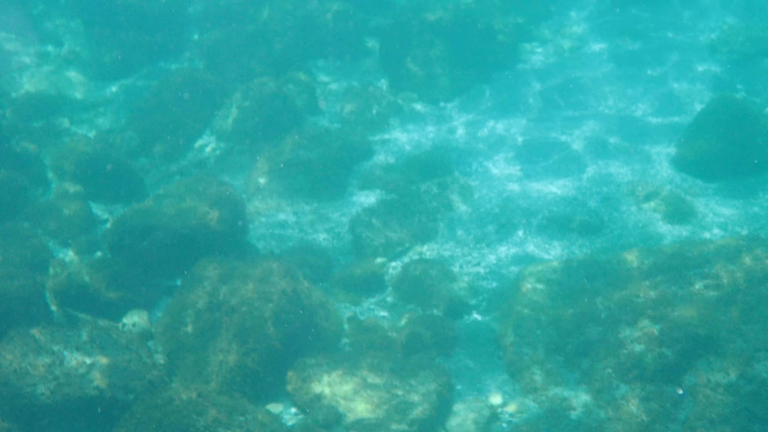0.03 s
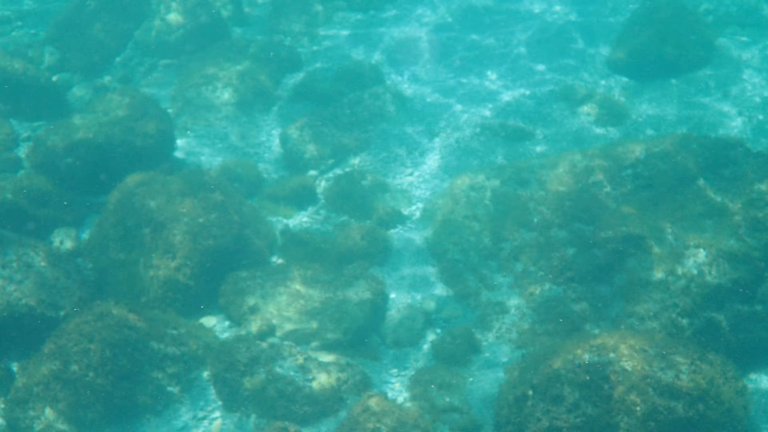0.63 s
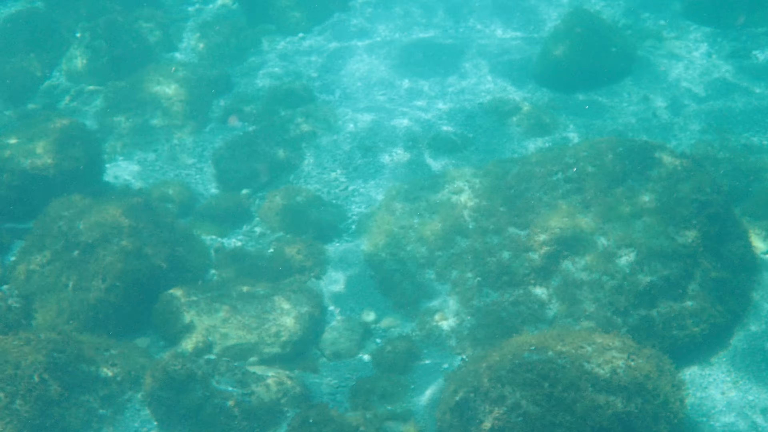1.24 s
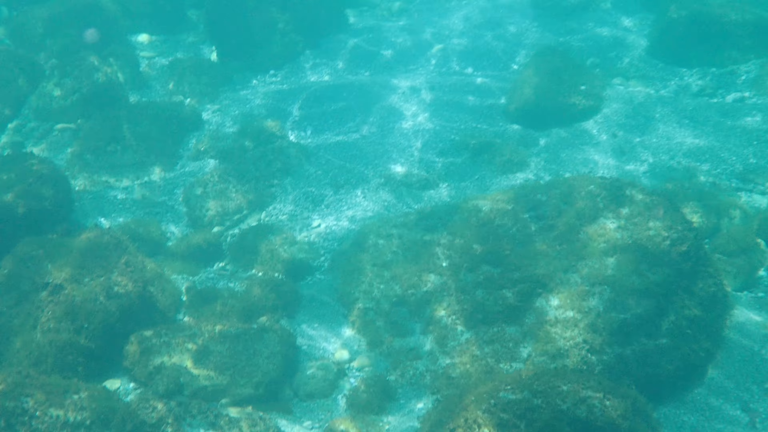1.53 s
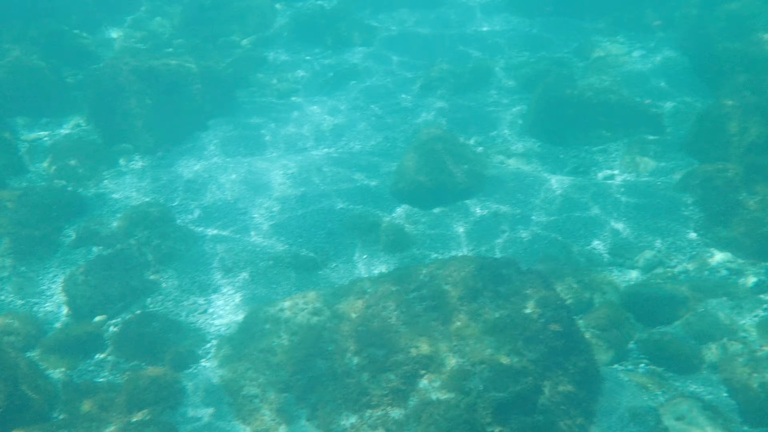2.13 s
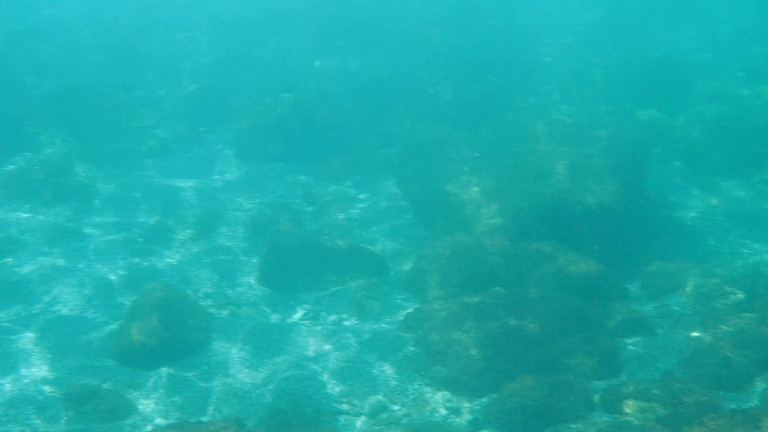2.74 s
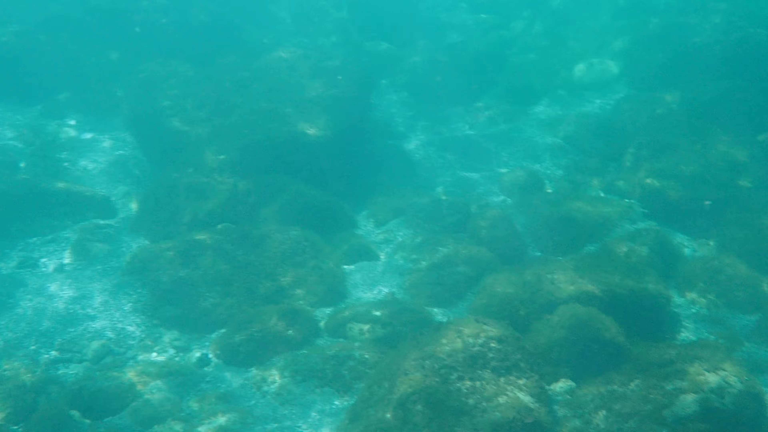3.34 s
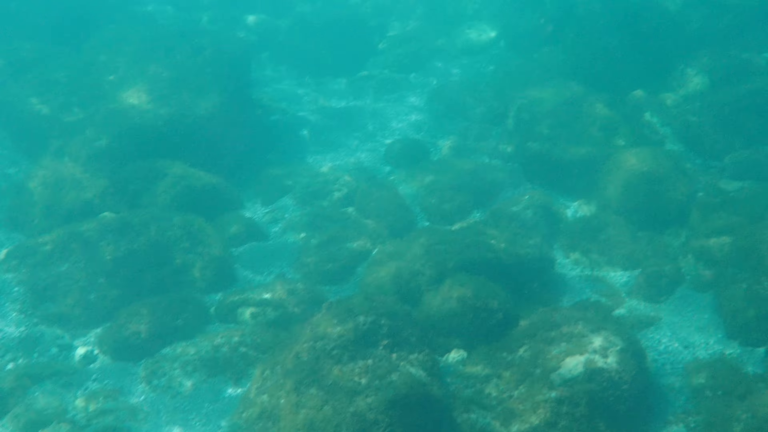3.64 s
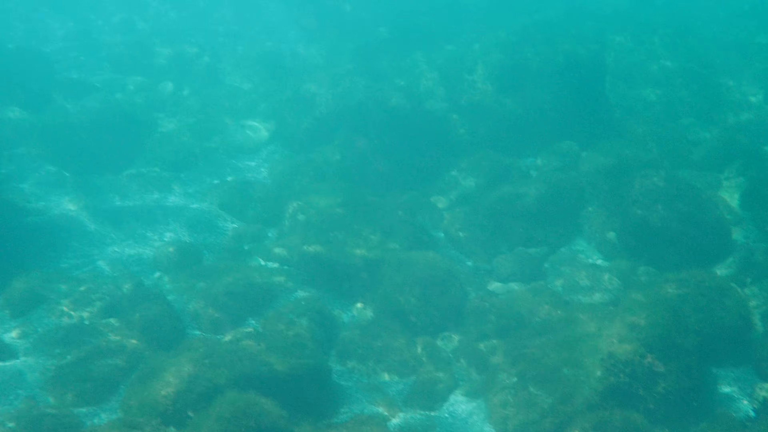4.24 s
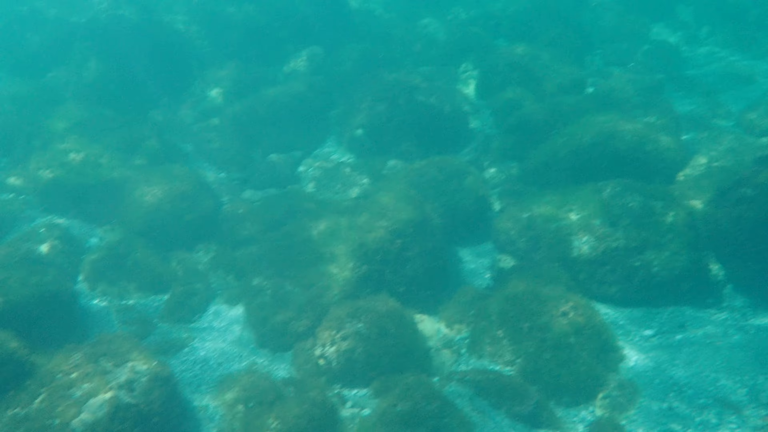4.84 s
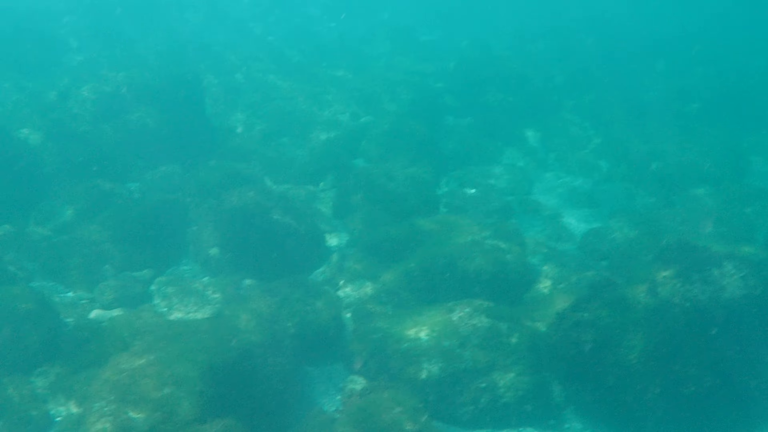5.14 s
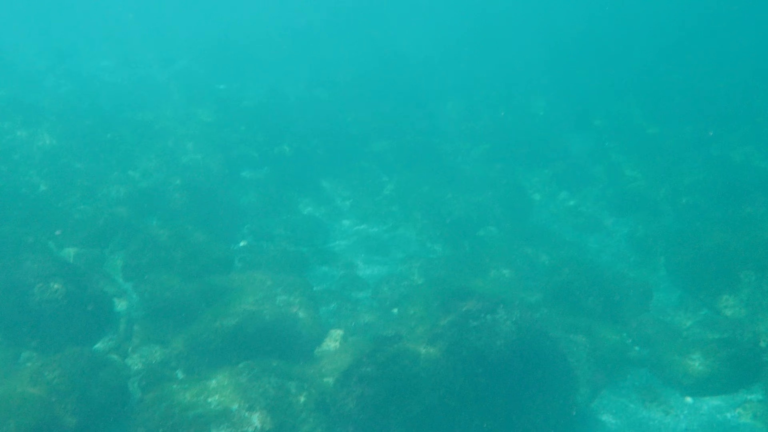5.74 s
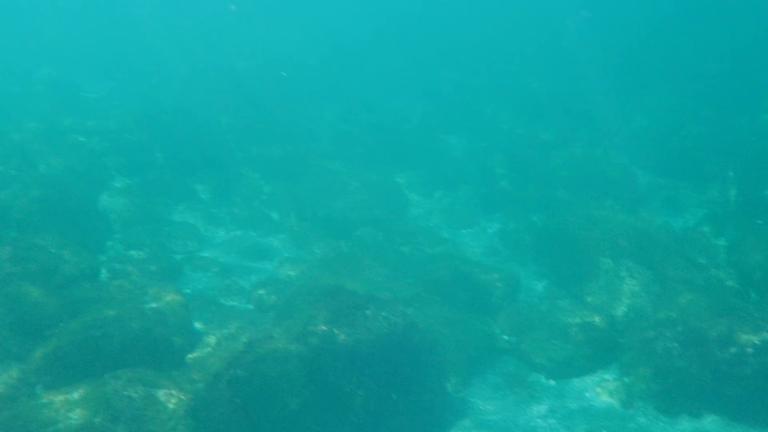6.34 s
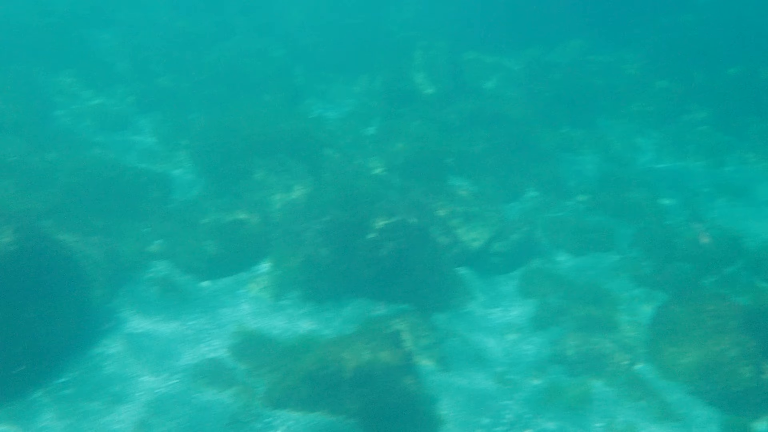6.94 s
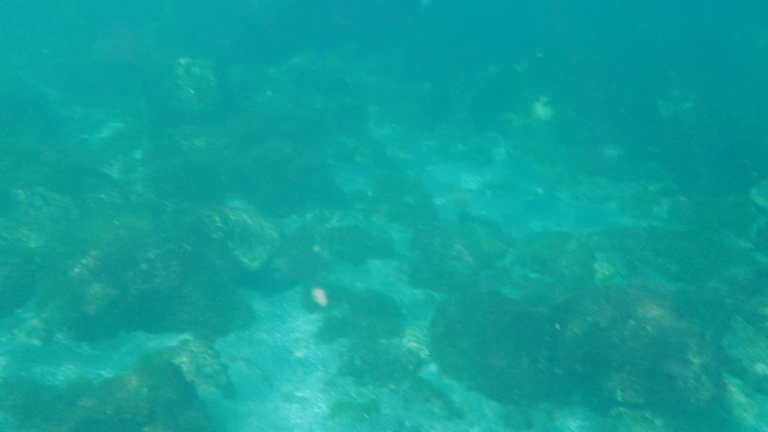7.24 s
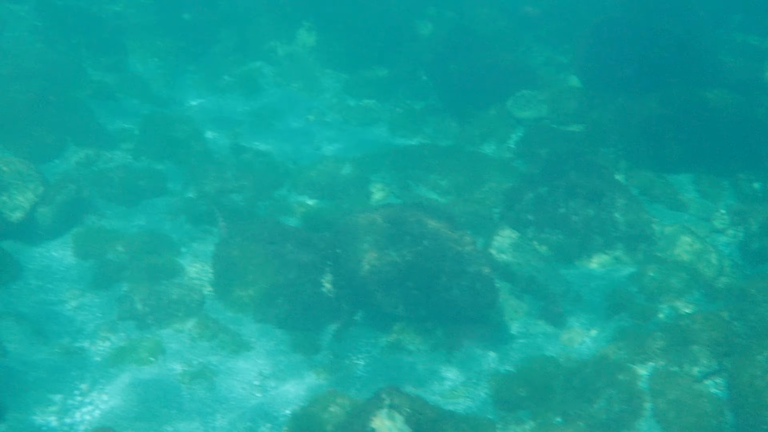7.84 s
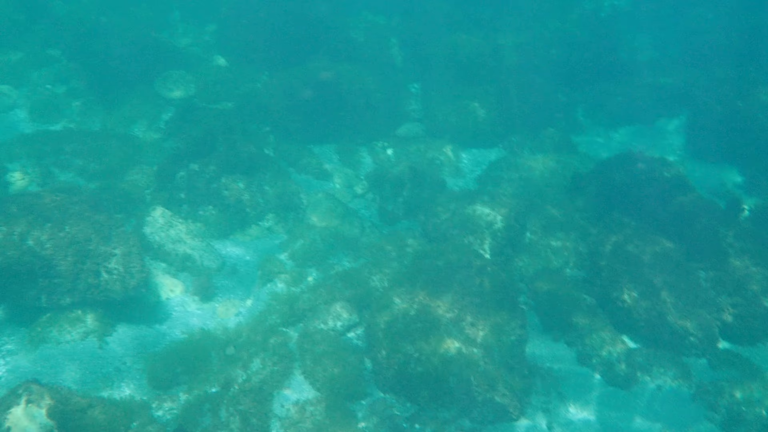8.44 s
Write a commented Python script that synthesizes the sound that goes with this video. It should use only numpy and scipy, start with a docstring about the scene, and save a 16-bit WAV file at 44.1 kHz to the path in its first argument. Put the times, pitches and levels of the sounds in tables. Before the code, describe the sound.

Heard from inside an underwater camera case in shallow water, a lumpy low rumble surges from side to side under a hollow hum that swells and sinks. Throughout, the case bumps dully right at the microphones and bubbles blip and gurgle. Many small shrimp clicks are scattered over a thin distant hiss and the wash of the surface, with the sharpest snap a little before halfway and a cluster toward the end.

```python
"""First comes a low rumble and a hollow hum: a camera in a sealed case, swimming over boulders in a
shallow sea. Eddies buffet its two microphone ports and gurgling water rings the air inside the case.
Farther off, the stirred surface washes and countless snapping shrimp merge into a crackling hiss.
Right at the microphones the case knocks dully; close by, shrimp snaps (collapsing cavities) ring it
near 6 kHz, bubbles blip and the hum swells briefly. Gain control ducks everything after loud peaks."""
import sys
import numpy as np
from scipy import signal
from scipy.fft import rfft, irfft, next_fast_len
from scipy.io import wavfile
from scipy.ndimage import uniform_filter1d, minimum_filter1d

SR = 44100
rng = np.random.default_rng(int(sys.argv[2]) if len(sys.argv) > 2 else 0)


def to_wav(sig):
    """Store sig (one row per channel, or 1-D mono) as 16-bit WAV at the path in sys.argv[1].

    Samples outside -1..1 are clipped; the rate is SR.
    """
    pcm = np.clip(np.atleast_2d(sig), -1, 1) * 32767
    pcm = np.round(pcm).astype(np.int16)
    wavfile.write(sys.argv[1], SR, pcm.T)  # frames by channels


N = 373968

# gusts of water as the camera is pushed along: (start [s], length [s], left [dB], right [dB])
GUSTS = [(0.2, 0.088, -19, -38), (0.821, 0.053, -22, -31.5), (1.984, 0.27, -25, -24.5),
         (2.262, 0.36, -22, -22.5), (2.587, 0.21, -25, -22), (2.852, 0.94, -37, -36.5),
         (3.317, 0.22, -19.5, -24), (3.674, 0.43, -19, -25), (4.394, 0.13, -32, -19.5),
         (4.663, 0.34, -25, -9), (5.086, 0.11, -17, -32), (5.463, 0.49, -20.5, -38.5),
         (6.153, 0.29, -25, -31), (6.658, 0.23, -17, -17), (7.01, 0.33, -38, -11), (7.477, 0.2, -24, -23.5),
         (7.675, 0.28, -25.5, -21)]
# long surges in the hum of the case: (time [s], low hum [dB], high hum [dB])
HUM_SURGES = [(0.16, -23.5, -20.5), (0.45, -21, -16.5), (1.0, -18.5, -17.5), (1.45, -29.5, -22),
              (1.9, -27, -20.5), (2.55, -30, -28.5), (2.85, -29.5, -21), (3.1, -31.5, -23), (3.5, -20, -21),
              (4.2, -18, -15.5), (4.6, -20.5, -17.5), (5.15, -28, -21), (5.4, -36.5, -27.5),
              (6.1, -33, -25.5), (6.3, -19, -19), (6.45, -22, -13), (6.75, -22, -12), (7.1, -22.5, -16.5),
              (7.4, -31, -26), (7.85, -26.5, -18.5), (8.47, -21, -23)]
# air resonances of the case, the low hum first, then the high hum: (pitch [Hz], width [Hz], level [dB])
CASE_MODES = [(378, 83.6, 1), (534, 74, 0.53), (769, 49, -27), (1173, 81, -36.5), (1493, 43, -38.5)]
# the open water, at a distance: (time [s], surface wash [dB], far shrimp [dB])
OPEN_WATER = [(0.16, -34.5, -45), (0.35, -36, -49), (0.6, -38, -47), (1.3, -40, -50.5),
              (1.95, -36.5, -47.5), (2.2, -41, -50), (2.6, -38.5, -47), (3.15, -30, -39), (3.42, -37, -45),
              (3.65, -40, -49), (4.2, -44.5, -55), (4.55, -33, -54.5), (4.9, -39.5, -53.5),
              (5.35, -51, -56), (6.1, -44, -57), (6.8, -46.5, -53), (7.25, -45, -55.5), (7.55, -38.5, -48),
              (8.0, -39, -47.5), (8.47, -44.5, -53.5)]
# the path through the case to the microphones:
# (frequency [Hz], left minus right [dB], left lead [rad], likeness [0-1])
CASE_TO_PORTS = [(200, -17, .4, .6), (550, -24, .9, .75), (800, -17, 2.15, .9), (1000, -12.5, 1.9, .96),
                 (1200, -7.5, 2.4, .97), (1560, -2.5, 1.65, .96), (2200, -.5, 1.25, .9),
                 (2450, -3, .55, .85), (3100, -6, 1.6, .7), (3480, -4, 0, .2), (3900, 0, -1.9, .75),
                 (5200, 11, -1.15, .92), (6300, 5, -1.3, .94), (8300, .5, -1, .68), (9400, 0, 0, .55),
                 (11000, .5, -.6, .75), (15000, -1, -.8, .3)]
# dull knocks on the case: (time of peak [s], left [dB], right [dB], pitch [Hz], dry tick [dB])
KNOCKS = [(0.254, -20, -15, 175, -13), (0.519, -18, 3.5, 192, -16), (0.96, -23, -23, 197, -26),
          (1.472, -30, -6.5, 168, -33), (2.068, 2, -11, 160, -22), (2.123, -18, -20, 109, -24),
          (2.149, -6, -14, 110, -29), (2.249, 1, -31, 190, -43), (2.443, -26, 0.5, 123, -32),
          (2.475, -12, -14, 109, -32), (2.529, -1.5, -19, 156, -19), (2.564, -8, -9, 157, -23),
          (2.687, -3, -35, 161, -26), (2.779, 1.5, 2, 201, -14), (3.323, -9, -26, 190, -28),
          (3.44, -3, -26, 164, -20), (3.495, -0.5, -27, 210, -34), (3.878, -4.5, -22, 233, -24),
          (4.049, -4, -18, 257, -22), (4.101, -27, -7, 110, -25), (4.193, -35, -1, 132, -17),
          (4.423, -24, -4, 96, -33), (4.446, -31, -4, 150, -30), (4.811, 0.5, -4, 170, -32),
          (5.645, -2, -39, 131, -23), (5.818, -2.5, -26, 137, -37), (6.293, -12, -17, 150, -19),
          (6.76, -22, -1.5, 100, -20), (7.04, -10, -28, 130, -40), (7.107, -24, -9, 156, -18),
          (7.154, -37, 3.5, 119, -16), (7.238, -12, 2, 102, -15), (7.389, -19, -4.5, 257, -47),
          (7.477, -6, 2.5, 214, -15), (7.552, -4, -14, 110, -30), (7.583, -11, 0.5, 243, -28),
          (7.609, -22, -10, 384, -18), (7.615, 6, -39, 164, -26), (7.754, -26, -5, 104, -32),
          (7.851, -22, -1, 110, -28), (8.12, -19, -13, 141, -30), (8.39, -6, 7, 237, -11)]
# shrimp close by: (time [s], level [dB], low crack [relative dB], bright edge [relative dB],
# top sizzle [relative dB], scatter time [s])
NEAR_SNAPS = [(0.277, -31.5, -1, 1.5, -12, 0.012), (0.345, -29, -24, -2, -18, 0.014),
              (0.474, -34, -25, -17, -21, 0.017), (0.607, -41.5, -26, 17.5, -8, .0013),
              (0.763, -34.5, 4.5, -15, -23, .008), (0.881, -28, -15, -5, -16, 0.0034),
              (1.116, -19.5, -10, -27, -12, 0.01), (1.4029, -35, 5.5, -5, -2, 0.0089),
              (1.493, -30.5, -17, -5, -16, .002), (1.58, -34, -18, -2, -14, 0.012),
              (1.666, -33, -19, -9, -16, .004), (1.741, -39, -20, 3, -12, .009),
              (1.7787, -26.5, -28, -11, -16, 0.0068), (1.874, -31.5, -8, -12, -18, .006),
              (1.935, -22.5, 0.5, -22, -15, 0.0084), (1.985, -33, -12, -4, -18, .006),
              (2.371, -25.5, -17, -5, -14, 0.0099), (2.389, -25, 4, -7, -14, 0.0068),
              (2.479, -28, -25, -20, -20, .006), (2.657, -14.5, -9, -14, -11, 0.01),
              (2.7125, -19, -11, -15, -9, 0.014), (3.1279, -18.5, -10, -29, -22, 0.006),
              (3.3442, -18.5, -8, 0, -23, 0.0049), (3.3672, -20, -13, -24, -20, 0.0083),
              (3.3827, -20, -9, -29, -18, 0.017), (3.5285, -13.5, -27, -40, -24, .002),
              (3.5518, -20, -12.5, -16, -14, 0.0035), (3.682, -36, -21, -7, -16, 0.007),
              (3.6986, -3.5, -23, -21, -16.5, .0038), (3.834, -36.5, -16, -12, -16, 0.0064),
              (4.097, -33, -10, -14, -16, 0.0091), (4.202, -26, -1, -16, -18, 0.005),
              (4.332, -30, -9.5, -32, -24, 0.013), (4.469, -17, -9.5, -11, -11, 0.0074),
              (4.504, -21, -11, -18, -13, 0.012), (4.696, -26, -26, -15, -20, 0.011),
              (4.784, -30, -21, -3, -16, 0.0087), (5.1303, -28.5, -5, -6, -11, .011),
              (5.15, -24.5, -30, -14, -9, 0.012), (5.291, -33.5, -16, -14, -18, 0.0046),
              (5.355, -40, -8, 2, -14, 0.011), (5.5823, -30.5, -25, 2.5, 2, 0.0046),
              (5.6245, -30, 3.5, -22, -10, 0.0072), (5.66, -36, -4, -7, -18, 0.0073),
              (6.15, -36, -8, -6.5, -14, 0.031), (6.43, -41, -5, 0, -17, 0.006),
              (6.4685, -24.5, -6, -23, -22, 0.014), (6.583, -31, -6.5, -7, -17, 0.017),
              (6.695, -29.5, -9, -24, -18, 0.014), (6.825, -31.5, -16, -10.5, -20, .005),
              (7.096, -38.5, -8, -12, -20, 0.0046), (7.195, -14, -33, -6, -13, 0.0034),
              (7.281, -33.5, -7, -14, -18, .005), (7.352, -11.5, -22.5, -29, -21, .0071),
              (7.384, -34, -9, -20, -20, 0.013), (7.4862, -21.5, -6.5, -44, -22, .0035),
              (7.5457, -10, -24, -16, -23, .0031), (7.558, -14.5, -35, -9, -36, 0.0088),
              (7.643, -32, -3, -23, -20, .011), (7.8257, -17, -18.5, -21, -13, 0.0059),
              (8.12, -38, -5, -14, -18, .006), (8.247, -26, 0.5, -30, -9, 0.0073)]
# bubble blips and brief swells of the hollow hum (near 510-580 Hz): (time [s], level [dB], pitch [Hz])
BLIPS_AND_SWELLS = [(0.472, -10, 510), (0.806, -4.5, 515), (0.898, -23.5, 1625), (0.952, -9.5, 555),
                    (1.028, -26, 1010), (1.072, -20, 910), (1.527, -31, 1546), (1.646, -25, 1330),
                    (1.688, -29, 1735), (1.77, -3, 488.4), (1.812, -25, 1040), (1.823, -23, 1380),
                    (1.977, -23, 773), (1.993, -22, 970), (2.021, -27, 1580), (2.228, -29, 1350),
                    (2.236, -17.5, 776), (2.728, -8.5, 518), (2.858, -15, 1120), (2.91, -15, 188),
                    (3.11, -19, 1150), (3.211, -17.5, 640), (3.352, -20, 1080), (3.403, -24.5, 1570),
                    (3.543, -18.5, 693), (3.876, -27, 800), (4.053, -28, 1636), (4.092, -14, 518),
                    (4.178, -4.5, 366.5), (4.311, -24, 1225), (4.41, -3, 80.3), (4.445, -17.5, 756),
                    (4.473, -2.5, 521), (4.5, -23.5, 1240), (4.558, -22.5, 1190), (4.565, -14, 887),
                    (4.567, -7, 504), (4.59, -18, 710), (4.628, -5, 68.5), (4.654, -1, 545),
                    (4.722, -2, 118.7), (4.735, -25, 1120), (4.755, -8, 140.5), (4.793, -17.5, 765),
                    (4.798, -3, 102.5), (4.868, -2.5, 182.5), (5.04, -24, 710), (5.14, -5, 528.7),
                    (5.874, -19.5, 850), (5.89, -8, 515), (5.947, -9.5, 510), (6.087, -26.5, 830),
                    (6.166, -27, 1006), (6.178, -2, 194), (6.212, -7, 188), (6.279, -4.5, 71.3),
                    (6.4, -13.5, 577), (6.447, -6.5, 552), (6.64, -13, 510), (6.672, -8, 75.7),
                    (6.708, -9, 525), (6.73, -5, 83.8), (6.883, -28.5, 754), (7.081, -0.5, 139.2),
                    (7.127, -4, 101.6), (7.21, 0.5, 90), (7.434, -21.5, 946), (7.601, -3, 456),
                    (7.722, -7.5, 89.3), (7.727, -23, 1207), (7.872, -26.5, 1008), (8.055, -20.5, 1037),
                    (8.112, -19.5, 774), (8.114, -21, 1080), (8.16, -14, 588), (8.278, -10, 206)]

# the spectrum of each sound: (frequency [Hz], relative level [dB])
LEFT_RUMBLE = [(8, -36), (20, 0), (50, 5.5), (100, 0.5), (160, -10), (250, -9.5), (400, -12.5),
               (550, -29.5), (680, -35), (1000, -53), (2000, -77)]  # eddies at the left port
RIGHT_RUMBLE = [(8, -34.5), (20, -46.5), (45, -4), (90, -6), (180, -4.5), (250, -13), (400, -27),
                (600, -34.5), (1200, -76.5), (2500, -88)]  # eddies at the right port
DRY_TICK = [(700, 2.5), (2000, 6), (3200, -6), (4300, -12.5), (5500, -31), (12000, -44.5)]  # a dry tick
CASE_HOLLOW = [(120, -31.5), (230, -17), (300, -13), (335, -8), (365, -38.5), (400, -7.5), (450, 4.5),
               (490, -21.5), (530, -1.5), (570, 1.5), (610, -20), (670, -42.5), (900, -25.5), (2000, -95.5)]  # the air space inside the case
SURFACE_WASH = [(350, -32), (600, -1), (760, 0), (1000, -1.5), (1500, -6), (2000, -15.5), (2500, -27.5),
                (3200, -42), (4200, -35.5), (7000, -72.5)]  # the stirred surface
FAR_HISS = [(1500, -48), (3300, -34), (4200, -30), (4800, -16), (5400, -6), (6200, -1.5), (6800, -2),
            (7500, -12), (8800, -12), (10500, -23), (15500, -35)]  # far shrimp ringing the case
MID_CRACKLE = [(700, -26), (1400, -5.5), (1950, -1), (2500, -10.5), (3300, -23.5), (4200, -26.5),
               (4800, -11.5), (5400, -8), (6200, 2), (6800, -0.5), (7500, -6), (8800, -9), (10500, -24.5),
               (15500, -29)]  # shrimp at middle distance
AIRY_FIZZ = [(2500, -38), (5000, -8), (9000, 13.5), (10500, 0), (15500, -0.5)]  # thin hiss on top
SNAP_RING = [(900, -50), (2500, -27.5), (4200, -30.5), (5300, -2.5), (6300, 3.5), (7000, -1), (7700, -14.5),
             (9500, -18), (15500, -52)]  # the case rung by a close snap
SNAP_EDGE = [(3000, -62.5), (6500, -8), (8500, 8), (10500, -11), (15500, -28)]  # that snap's bright edge
SNAP_SIZZLE = [(3000, -22), (5000, -16), (9000, 5.5), (11500, 1.5), (15500, -2)]  # its top sizzle
# its low crack
SNAP_CRACK = [(300, -27), (700, 0.5), (1500, 9.5), (2200, -1.5), (3200, -25), (4200, -14.5), (7000, -37)]


def gain_of(db):
    """Decibels to amplitude."""
    return 10 ** (np.asarray(db) / 20)


def unit_rms(x):
    """Scales to rms 1."""
    return x / np.sqrt(np.mean(x ** 2) + 1e-20)


def curves(table):
    """Every column of a time table, at each sample."""
    times, *columns = np.transpose(table)
    return [np.interp(np.arange(N) / SR, times, column) for column in columns]


def at_hz(table, hz):
    """Every column of a frequency table at hz, interpolated on a log axis."""
    freqs, *columns = np.transpose(table)
    return [np.interp(np.log(hz + 1), np.log(freqs + 1), column) for column in columns]


def add(mix, s, sound):
    """Mixes a sound in at time s."""
    part = mix[..., max(round(s * SR), 0):][..., :sound.shape[-1]]
    part += sound[..., :part.shape[-1]]


def colour(x, spectrum, size=8192):
    """Causal filter of unit energy with the given spectrum."""
    log_gain = np.log(gain_of(at_hz(spectrum, abs(np.fft.fftfreq(size, 1 / SR)))[0]))
    ring = np.fft.ifft(np.exp(np.conj(signal.hilbert(log_gain)))).real[:size // 2]  # minimum phase
    return signal.oaconvolve(np.atleast_2d(x), ring[None] / np.linalg.norm(ring), axes=1)[:, :N]


def flutter(rate_hz, depth_db):
    """A random gain of rms 1 that wanders up to the given rate."""
    size = next_fast_len(N)
    rolloff = 1 + (np.fft.rfftfreq(size, 1 / SR) / rate_hz) ** 4
    slow = irfft(rfft(rng.standard_normal(size)) / rolloff, size)[:N]
    return unit_rms(gain_of(depth_db * unit_rms(slow)))


def impulses(per_s, spread_db, cap=7.9):
    """Random impulses, most small and a few large."""
    size = gain_of(spread_db * np.minimum(rng.exponential(1, N), cap))
    return size * rng.choice([-1, 1], N) * (rng.random(N) < per_s / SR)


def strays(*ranges, count):
    """Rows of small events at random times, each further column drawn from its (low, high) range."""
    low, high = np.transpose([(0, N / SR), *ranges])
    return list(low + (high - low) * rng.random((count, len(low))))


def flow(calm_db, side, skew=0.84):
    """Strength of the flow at one port (0 left, 1 right): a steady calm plus gusts."""
    power = np.full(N, gain_of(calm_db) ** 2)
    for s, length, *port_db in GUSTS:
        age = np.linspace(0, 1, int(length * SR))
        swell = np.sin(np.pi * age ** skew)  # builds faster than it fades
        add(power, s, (gain_of(port_db[side]) * swell) ** 2)
    return np.sqrt(power)


def eddy_rumble(flows):
    """Right on the microphones: the flow sheds its own lumpy eddies at each port."""
    ports = []
    for strength, spectrum in zip(flows, (LEFT_RUMBLE, RIGHT_RUMBLE)):
        eddies = rng.standard_normal(N) * flutter(rate_hz=22.6, depth_db=4.5)
        ports.append(strength * unit_rms(colour(eddies, spectrum)[0]))
    return np.array(ports)


def dry_ticks(strength, left_db=-56, right_db=-41):
    """Soft dry ticks crackle, louder in strong gusts, mostly at the right microphone."""
    taps = impulses(per_s=36, spread_db=3, cap=2.2) * np.sqrt(strength / np.median(strength))
    return colour(taps, DRY_TICK) * gain_of([[left_db], [right_db]])


def resonate(x, hz, width_hz):
    """A steep resonance of gain 1 that follows the pitch curve hz."""
    carrier = np.exp(2j * np.pi * np.cumsum(hz) / SR)
    pole = np.exp(-np.pi * width_hz / SR)
    envelope = signal.lfilter([(1 - pole) ** 2], [1, -2 * pole, pole ** 2], x / carrier)
    return 2 * (carrier * envelope).real


def steadied(x, share):
    """Evens out a share of the quick swings in level, so that a ring holds on."""
    power = abs(uniform_filter1d(x ** 2, size=900)) + 1e-12
    return unit_rms(x / power ** (share / 2))


def hollow_hum(low_db, high_db, left_db=-24.5, right_db=2.5, wall_hz=590):
    """Gurgling water rings the air in the case, mostly on the right; the pitch sways with pressure."""
    gurgle = rng.standard_normal(N) * flutter(rate_hz=12, depth_db=1.87)
    gurgle *= flutter(rate_hz=2.75, depth_db=1.7)
    sway = flutter(rate_hz=5.1, depth_db=0.2)
    low, main, *upper = [gain_of(db) * unit_rms(resonate(gurgle, hz * sway, width_hz))
                         for hz, width_hz, db in CASE_MODES]
    broad = unit_rms(colour(rng.standard_normal(N), CASE_HOLLOW)[0])
    hum = gain_of(low_db) * low + gain_of(high_db) * steadied(main, share=0.33)
    hum += gain_of((low_db + high_db) / 2 - 8) * broad
    # above its main resonance the case passes little, apart from a few faint upper modes
    hum = signal.sosfilt(signal.butter(6, wall_hz, fs=SR, output="sos"), hum)
    hum += gain_of(high_db) * sum(upper)
    return hum * gain_of([[left_db], [right_db]])


def through_case(pair, diffuse=True):
    """The case shifts level and phase between ports: diffuse sound is partly alike, a point wholly."""
    size = next_fast_len(N)
    side_db, lead, likeness = at_hz(CASE_TO_PORTS, np.fft.rfftfreq(size, 1 / SR))
    likeness = likeness if diffuse else 1
    tilt = gain_of(side_db)
    common, separate = rfft(pair, size)
    left = tilt * np.exp(1j * lead) * common
    right = likeness * common + np.sqrt(1 - likeness ** 2) * separate
    return irfft(np.array([left, right]) * np.sqrt(2 / (1 + tilt ** 2)), size)[:, :N]


def blip(hz, t60, rise_s, glide):
    """A short tone that swells, rings and climbs slightly in pitch, as a bubble does."""
    t = np.arange(int(t60 * SR) + 2) / SR
    swell = (1 - np.exp(-(t / rise_s) ** 2)) * gain_of(-60 * t / t60)
    return swell / swell.max() * np.sin(2 * np.pi * hz * t * (1 + glide * t / t60))


def surface_wash(level_db, hiss_db=2.55, swarm_db=-2):
    """The stirred surface overhead: a soft wash with a swarm of tiny bubbles in it."""
    churn = rng.standard_normal((2, N)) * flutter(rate_hz=25, depth_db=2.5)
    wash = gain_of(hiss_db) * unit_rms(colour(churn, SURFACE_WASH))
    swarm = np.zeros(N)
    for hz in np.geomspace(680, 1900, 24):
        bubble = blip(hz, t60=70 / hz, rise_s=0.003, glide=0.003) * gain_of(at_hz(SURFACE_WASH, hz)[0])
        swarm += signal.oaconvolve(impulses(per_s=3.5, spread_db=0.5), bubble)[:N]
    wash[0] += gain_of(swarm_db) * unit_rms(swarm)
    return gain_of(level_db) * flutter(rate_hz=11, depth_db=-0.8) * wash


def snap(direct, scatter_s, echo, size=4096):
    """A collapsing cavity: one sharp crack, then its scatter from the rocks and the surface."""
    t = np.arange(size) / SR
    shape = direct * np.exp(-t / 0.00035) + np.exp(-t / scatter_s) + echo * np.exp(-t / 0.011)
    return rng.standard_normal((2, size)) * shape / (direct + 1 + echo)


def far_shrimp(level_db, hiss_db=1.5, crackle_db=1.5):
    """Countless far snaps merge into a hiss; those at middle distance crackle over it in many tints."""
    crackle = np.zeros((2, N))
    for hz in np.geomspace(5200, 13500, 16):
        tint = [(hz / 3, -16), (hz / 2, -10), (hz, 0), (hz * 1.64, -10)]
        crack = colour(snap(direct=1.5, scatter_s=0.007, echo=0.06), tint)
        onsets = impulses(per_s=4.5, spread_db=2.5, cap=2.84)
        crackle += signal.oaconvolve(onsets[None], crack, axes=1)[:, :N]
    hiss = gain_of(hiss_db) * colour(rng.standard_normal((2, N)), FAR_HISS)
    return gain_of(level_db) * (hiss + gain_of(crackle_db) * unit_rms(colour(crackle, MID_CRACKLE)))


def airy_fizz(hum_db, shrimp_db, level_db=-54.5, duck=0.18, follow=0.17, shared=0.3):
    """A thin, airy hiss that grows with the far shrimp and comes forward whenever the hum sinks."""
    noise = rng.standard_normal((3, N))
    pair = np.sqrt(1 - shared) * noise[:2] + np.sqrt(shared) * noise[2]
    swell_db = follow * (shrimp_db - shrimp_db.mean()) - duck * (hum_db - hum_db.mean())
    return gain_of(level_db + swell_db) * colour(pair, AIRY_FIZZ)


def case_knocks(cycles=0.23, ring_db=-14, light_db=(-28, -14), light_hz=(120, 300)):
    """A knock on the case is a push of about one cycle with a dry tick; it also rings the air inside."""
    thuds = np.zeros((2, N))
    blows, ticks = np.zeros((2, N))
    t = np.arange(-900, 1500) / SR  # zero at the peak
    width = cycles * np.where(t < 0, 1, 1.5)  # dies more slowly than it builds
    light = strays(light_db, light_db, light_hz, (-38, -27), count=18)  # columns as in KNOCKS
    for s, left_db, right_db, hz, tick_db in KNOCKS + light:
        force = gain_of([[left_db], [right_db]])
        push = -np.cos(2 * np.pi * hz * t + 1) / np.cosh(2 * hz * t / width)
        add(thuds, s + t[0], force * push)
        add(blows, s, force[0])
        add(ticks, s, gain_of([tick_db]))
    ring = colour(blows, CASE_HOLLOW)[0]
    thuds[1] += gain_of(ring_db) * ring / abs(ring).max()  # blows on the left ring at the right port
    return thuds + colour(ticks, DRY_TICK) * gain_of([[-13], [-1.5]])


def near_shrimp(far_db, over_far_db=(6, 11)):
    """Close snaps ring the case; the louder the snap, the more its crack stands out of the scatter."""
    ring, crack, edge, sizzle = np.zeros((4, 2, N))
    # faint snaps barely clear the far crackle; columns as in NEAR_SNAPS
    faint = strays(over_far_db, (-15, -2), (-20, -2), (-22, -10), (0.003, 0.009), count=26)
    faint = [(s, far_db[int(s * SR)] + db, *rest) for s, db, *rest in faint]
    for s, db, crack_db, edge_db, sizzle_db, scatter_s in NEAR_SNAPS + faint:
        direct = 3.8 * gain_of(0.51 * (db + 6.5))
        add(ring, s + 0.00025, gain_of(db + 1) * snap(direct, scatter_s, echo=0.51))
        add(crack, s, gain_of(db + crack_db + 3) * snap(0.32, 1.53 * scatter_s, echo=0.13))
        add(edge, s + 0.0005, gain_of(db + edge_db + 1) * snap(direct, scatter_s, echo=0.03))
        add(sizzle, s + 0.0005, gain_of(db + sizzle_db - 1) * snap(2.6, 0.6 * scatter_s, echo=0.02))
    return (colour(ring, SNAP_RING) + colour(crack, SNAP_CRACK)
            + colour(edge, SNAP_EDGE) + colour(sizzle, SNAP_SIZZLE))


def blips_and_swells(wash_db, level_db=-4, over_wash_db=(0, 8), small_hz=(800, 2100)):
    """Bubble blips and brief swells of the hollow hum; small bubbles get louder with the wash."""
    blips = np.zeros(N)
    small = [(s, wash_db[int(s * SR)] + db + at_hz(SURFACE_WASH, hz)[0] / 2, hz)
             for s, db, hz in strays(over_wash_db, small_hz, count=170)]
    for s, db, hz in BLIPS_AND_SWELLS + small:
        t60 = 0.083 * (1000 / hz) ** 0.47  # lower tones ring longer
        add(blips, s - 0.003, gain_of(db) * blip(hz, t60, rise_s=0.0055, glide=0.0037))
    blips *= gain_of(level_db) * flutter(rate_hz=76, depth_db=3)  # a quick wobble roughens the ring
    return through_case([blips, blips], diffuse=False)


def scene():
    """The open water reaches the microphones through the case; flow and knocks act on it directly."""
    low_db, high_db = curves(HUM_SURGES)
    wash_db, shrimp_db = curves(OPEN_WATER)
    left, right = flow(calm_db=-25, side=0), flow(calm_db=-28.5, side=1)
    close = eddy_rumble((left, right)) + dry_ticks(right) + hollow_hum(low_db, high_db) + case_knocks()
    water = surface_wash(wash_db) + far_shrimp(shrimp_db) + near_shrimp(shrimp_db)
    return close + through_case(water) + airy_fizz(high_db, shrimp_db) + blips_and_swells(wash_db)


def record(dry, start_s=0.155, threshold_db=-9.5, recover_db_per_s=21.5, ceiling=0.86, top_hz=16100):
    """The microphones open after a moment, into gain control, a peak limiter and a low-pass filter."""
    t = np.arange(N) / SR
    switch_on = np.clip((t - start_s) / 0.002, 0, 1)
    excess_db = np.maximum(20 * np.log10(abs(dry).max(0) + 1e-9) - threshold_db, 0)
    recovery_db = t * recover_db_per_s
    held_db = np.maximum.accumulate(excess_db + recovery_db) - recovery_db
    duck_db = 0.31 * uniform_filter1d(held_db, size=201)  # only a share of the excess is taken off
    ducked = dry * switch_on * gain_of(-duck_db)
    headroom = ceiling / np.maximum(abs(ducked).max(0), ceiling)
    limiter = uniform_filter1d(minimum_filter1d(headroom, size=301), size=301)
    low_pass = signal.firwin(511, top_hz, window=("kaiser", 9), fs=SR)
    return signal.oaconvolve(ducked * limiter, low_pass[None], "same", axes=1)


dry = scene()
out = record(dry)
to_wav(out)
```